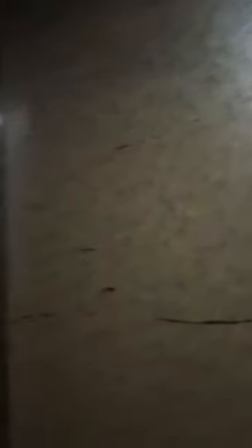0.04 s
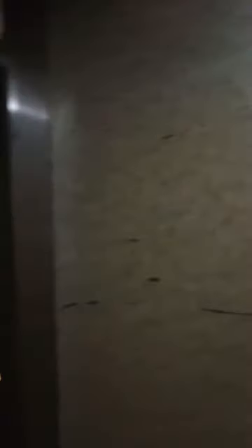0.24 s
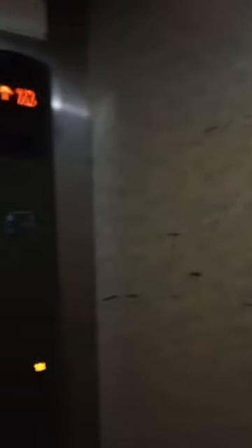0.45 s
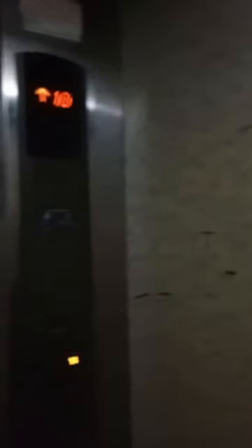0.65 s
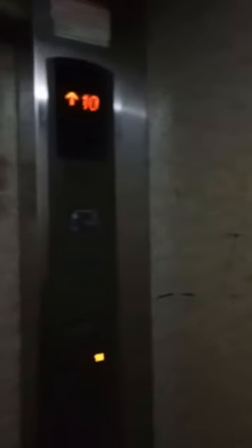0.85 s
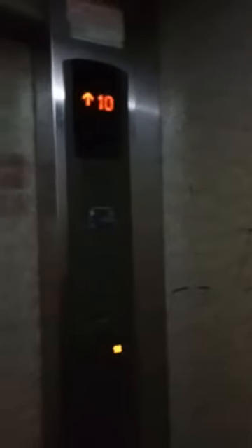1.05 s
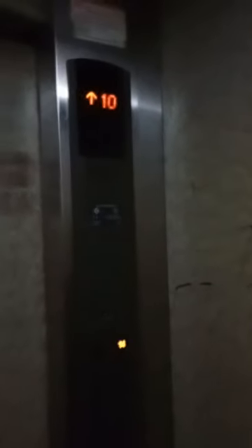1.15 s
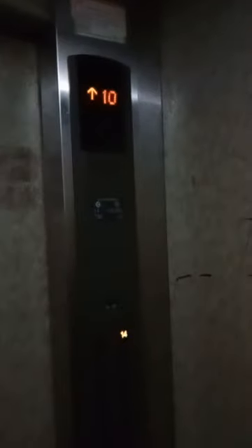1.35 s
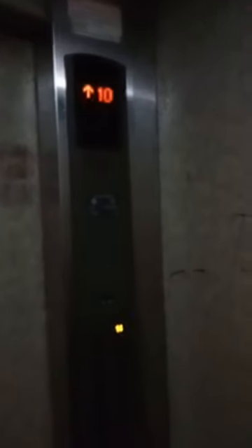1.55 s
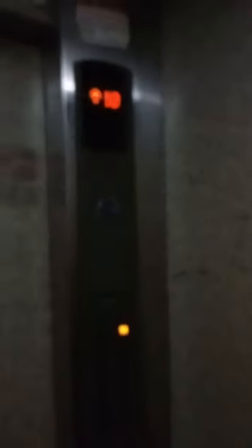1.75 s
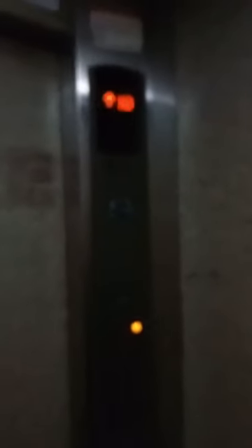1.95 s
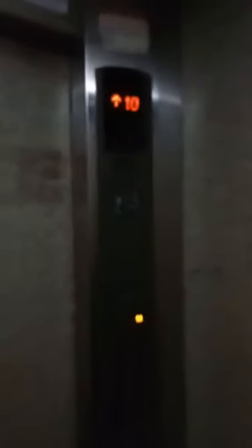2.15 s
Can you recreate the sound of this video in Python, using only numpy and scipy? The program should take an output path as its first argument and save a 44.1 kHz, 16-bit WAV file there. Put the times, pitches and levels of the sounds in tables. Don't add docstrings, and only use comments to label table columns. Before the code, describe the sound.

Gritty metallic scrape and rattle of a loose panel inside a small, low-rumbling elevator cabin

```python
import sys
import numpy as np
from scipy import signal
from scipy.fft import rfft, irfft, next_fast_len
from scipy.io import wavfile
from scipy.ndimage import map_coordinates

SR = 44100
rng = np.random.default_rng(int(sys.argv[2]) if len(sys.argv) > 2 else 0)


def boost(x):
    u = np.asarray(x, float) / 20
    return 10 ** u


def master(y):
    cut = np.clip(np.atleast_2d(y).T, -1, 1)
    pcm = np.round(cut * 32767)
    wavfile.write(sys.argv[1], SR, pcm.astype(np.int16))


N = 97020


def unit(x):
    return x / np.sqrt(np.mean(x ** 2) + 1e-20)


def along(points, hz):
    f, v = np.transpose(points)
    return np.interp(np.log(hz + 1), np.log(f + 1), v)


def wobble(rate, size):
    knots = rng.standard_normal(int(size * rate / SR) + 4)
    return map_coordinates(knots, [np.arange(size) * rate / SR])


def filtered(x, response):
    m = next_fast_len(len(x) + 4096)
    return irfft(rfft(x, m) * response(np.fft.rfftfreq(m, 1 / SR)), m)[:len(x)]


def peak(f, hz, width_hz):
    return 1j * f * width_hz / (hz * hz - f * f + 1j * f * width_hz)


def steadied(x, share):
    envelope = np.abs(signal.hilbert(unit(x)))
    return unit(unit(x) / (envelope + 0.083) ** share)


def add(track, s, sound):
    track[round(s * SR):][:len(sound)] += sound


def swell(t, rise_s, t60):
    fade_bend = 1.2
    fade_db = -60 * (np.clip(t - rise_s, 0, None) / t60) ** fade_bend
    return np.clip(t / rise_s, 0, 1) * boost(fade_db)


def grit(size):
    grains_per_s, spread_db, smooth_share, chatter_db = 9000, 1.5, 0.5, 1.2
    slip, size_draw, smooth = rng.standard_normal((3, size))
    struck = rng.random(size) < grains_per_s / SR
    grains = struck * slip * boost(spread_db * size_draw)
    mixed = (1 - smooth_share) * unit(grains) + smooth_share * smooth
    return mixed * boost(chatter_db * wobble(98.3, size))


def free_swings(blows, rise_s):
    out, t = np.zeros(N + SR), np.arange(SR // 2) / SR
    for s, db, t60, hz in blows:
        add(out, s, boost(db) * swell(t, rise_s, t60) * np.sin(2 * np.pi * hz * t))
    return out[:N]


def drive():
    # (frequency [Hz], density [dB per Hz])
    rumble_spectrum = [(15, -18), (35, -11), (81, 2.5), (277, -9), (476, -12.5), (694, -11), (1110, -20),
                       (2150, -20), (7000, -42), (9100, -40), (15400, -120)]
    # (pitch [Hz], width [Hz], level [dB])
    drones = [(85, 15, -71.5), (202, 93, -76.5), (269.3, 24, -69.5), (347, 39, -79), (623, 280, -78.5)]
    rumble_db, rumble_sway_db, hiss_db = -61.5, 1, -72
    drone_sway_db, drone_steady = 1.5, 0.5
    rumble = unit(filtered(rng.standard_normal(N), lambda f: boost(along(rumble_spectrum, f))))
    out = rumble * boost(rumble_db + rumble_sway_db * wobble(6.62, N))
    for hz, width_hz, db in drones:
        drone = filtered(rng.standard_normal(N), lambda f: peak(f, hz, width_hz) ** 2)
        out += boost(db + drone_sway_db * wobble(10.06, N)) * steadied(drone, drone_steady)
    return out + boost(hiss_db) * filtered(rng.standard_normal(N), lambda f: f > 2500)


def cabin(x):
    # (frequency [Hz], t60 [s])
    decay = [(200, 0.079), (1000, 0.17), (4000, 0.17), (8000, 0.1), (15000, 0.19)]
    turn_s = 0.03
    hz, t, z = signal.stft(rng.standard_normal((6, SR // 3)), SR, nperseg=256)
    tails = signal.istft(z * boost(-60 * t / along(decay, hz)[:, None]), SR, nperseg=256)[1]
    pose = np.arange(N) / SR / turn_s % len(tails)
    distance = [np.abs((pose - k + 3) % 6 - 3) for k in range(6)]
    shares = np.cos(np.pi / 2 * np.clip(distance, 0, 1))
    wet = signal.fftconvolve(x * shares, tails / np.linalg.norm(tails[0]), axes=1)
    return np.pad(wet.sum(0), (90, 0))[:N]


def thumps():
    # (time [s], level [dB], t60 [s], pitch [Hz])
    floor_blows = [(0., -58.5, 0.16, 75.2), (.58, -63, 0.15, 63), (.7, -51, 0.13, 70.6),
                   (.774, -42, 0.12, 77), (1.258, -51, 0.1, 82), (1.281, -48, .15, 65),
                   (1.325, -50, 0.053, 81), (1.466, -46.5, 0.19, 85), (1.499, -43, 0.058, 63.4),
                   (1.534, -51, 0.082, 86.4), (1.953, -47, 0.13, 86), (2.172, -45.5, 0.39, 76),
                   (.31, -60, 0.074, 60), (.52, -55, 0.14, 75.5), (.665, -54, .08, 55),
                   (.8, -56, 0.073, 170), (.94, -52, 0.14, 87), (1.42, -56, .1, 80), (1.915, -50, .08, 71),
                   (.56, -59, .1, 158), (.13, -57, .12, 81), (.245, -57, .1, 80), (.45, -59, 0.11, 60),
                   (.62, -57, .1, 60), (1.86, -59, .1, 80), (1.59, -61, .1, 150), (.24, -56, .15, 230),
                   (.275, -56, .15, 205), (1.63, -62, .12, 265)]
    return free_swings(floor_blows, rise_s=0.01)


def taps():
    # (time [s], level [dB], t60 [s], pitch [Hz])
    small_blows = [(.227, -45.5, 0.13, 874), (.394, -40.5, 0.086, 1071), (.483, -38.5, 0.046, 1060),
                   (.482, -42, 0.04, 6040), (1.405, -50.5, 0.094, 1140), (1.41, -50, 0.14, 859),
                   (1.892, -55, 0.16, 5000), (.422, -48, 0.063, 2460), (.44, -55, 0.13, 4200),
                   (.5, -53, 0.14, 4600), (.325, -47, .08, 1100), (.33, -48, .08, 1720),
                   (.42, -50, .25, 900), (1.28, -58, .08, 1400), (1.315, -60, .2, 800)]
    return free_swings(small_blows, rise_s=0.0023)


def tube():
    # (time [s], level [dB], fade t60 [s], pitch [Hz], overtone slope [dB per step])
    hollow = [
        (.32, -45.5, 0.57, 1117, 0.5),
        (.392, -42.5, 0.35, 1213, -2.1),
        (.481, -46.5, 0.42, 1250, -2.5),
        (1.19, -63, 1, 794, -4.5),
        (1.375, -59, 0.43, 890, -9.5),
        (1.375, -60, 0.67, 1114, -8),
        (1.412, -54, 0.36, 873, -8),
    ]
    rise_s, width_hz = 0.0031, 490
    open_hz = 1480
    sag = 0.08
    out, t = np.zeros(N + SR), np.arange(SR // 2) / SR
    for s, db, t60, hz, step_db in hollow:
        def modes(f):
            total = 0
            for k in range(1, 7):
                mode_hz = (k - sag * (k == 1)) * hz
                total = total + boost(step_db * (k - 1)) * peak(f, mode_hz, width_hz) ** 2
            return total / (1 + (hz > 1000) * (open_hz / (f + 1)) ** 2)
        add(out, s, boost(db) * swell(t, rise_s, t60) * unit(filtered(grit(len(t)), modes)))
    return out[:N]


def rings():
    # (time [s], level [dB], fade t60 [s],
    # pitch [Hz], width [Hz])
    panel_modes = [(.16, -65.5, 0.67, 253, 80), (.235, -54.5, 0.44, 196, 70), (.25, -57.5, 0.28, 270, 61),
                   (0.37, -63, 0.18, 260, 56), (.395, -50, 0.52, 946, 170), (.49, -50, 0.5, 900, 160),
                   (0.489, -59, 0.54, 1120, 110), (.765, -61, 0.19, 7120, 900),
                   (.78, -60.5, 0.28, 600, 270), (1.09, -56, 0.17, 7740, 270), (1.24, -62, 0.85, 251, 100),
                   (1.277, -50, 0.072, 5700, 230), (1.354, -59, .1, 5000, 1200),
                   (1.32, -58, 0.61, 7360, 530), (1.4, -59.5, 0.72, 230, 44), (1.45, -61, 0.49, 423, 75),
                   (1.476, -54, 0.11, 8900, 620), (1.476, -45.5, 0.056, 10400, 680),
                   (1.235, -64, .8, 830, 119), (1.896, -52.5, 0.13, 7440, 300),
                   (1.905, -47.5, 0.11, 10800, 297), (.228, -33, 0.08, 6300, 1900),
                   (1.94, -72, 0.073, 6300, 900), (2.11, -58.5, 0.096, 3300, 400),
                   (0.016, -58.5, 0.13, 10100, 300), (0.028, -60, 0.14, 7250, 300),
                   (0.032, -55, 0.18, 6600, 400), (.02, -59, .1, 3300, 440),
                   (.164, -59.5, 0.17, 10700, 270), (.164, -54.5, .12, 7700, 300),
                   (.172, -58.5, 0.24, 5600, 300), (.165, -57.5, 0.18, 3500, 670),
                   (.393, -50, 0.093, 4750, 260), (0.3, -55, 0.11, 3600, 260), (0.36, -50, .1, 6600, 300),
                   (1.277, -55.5, .2, 3700, 330), (1.362, -54.5, .2, 7000, 600),
                   (1.385, -64, 0.56, 2090, 230), (1.405, -59.5, 0.46, 1390, 150),
                   (.24, -42, 0.23, 7200, 660),
                   (.19, -59.5, 0.25, 200, 70), (.245, -54, 0.28, 663, 160), (.394, -52, 0.44, 1145, 180),
                  (.485, -50, 0.54, 1145, 204), (.226, -43, .15, 2250, 600), (1.41, -56.5, 0.62, 1042, 320),
                  (1.38, -59, 0.81, 858, 143), (1.36, -58, .6, 15000, 1500), (1.45, -56, 0.36, 15000, 1500),
                  (.215, -42, .12, 12000, 2400), (1.354, -47, .04, 6200, 2900), (1.5, -64, .3, 403, 55),
                  (0.76, -64, 0.26, 226, 60), (.6, -70, .9, 14500, 2000)]
    rise_s, steady = 0.0034, 0.63
    out, t = np.zeros(N + SR), np.arange(SR // 2) / SR
    for s, db, t60, hz, width_hz in panel_modes:
        ring = filtered(grit(len(t)), lambda f: peak(f, hz, width_hz) ** 2)
        add(out, s, boost(db) * swell(t, rise_s, t60) * steadied(ring, steady))
    return out[:N]


def scrapes():
    # (time [s], rise [s], level [dB], fade t60 [s], brightness [dB per octave])
    strokes = [(.012, 0.023, -45, 0.18, 4.5), (0.163, 0.0036, -50, 0.43, -0.5),
               (0.21, 0.0046, -31.5, 0.14, 3), (.223, 0.0061, -26.5, 0.24, 0), (.262, .015, -40, 0.22, -2),
               (.316, 0.0041, -32.5, 0.34, -1.5), (0.391, 0.0028, -39, 0.12, 6),
               (0.48, 0.003, -45, 0.28, -4.5), (.752, .026, -55.5, 0.12, 5.5),
               (0.804, 0.026, -60, 0.33, -3), (.845, 0.0043, -60.5, 0.89, -1),
               (0.988, 0.0066, -58.5, 0.3, 3.5), (1.087, 0.004, -51.5, 0.23, 2),
               (1.167, 0.002, -59.5, 0.31, -4), (1.228, 0.0064, -57.5, 0.92, -2),
               (1.274, 0.0035, -46.5, 0.25, 0.5), (1.314, 0.0026, -49, 0.15, 1),
               (1.352, 0.0024, -43.5, 0.59, 4), (1.473, 0.004, -41.5, 0.31, 7),
               (1.895, 0.015, -43, 0.28, 3.5), (1.912, 0.018, -44.5, 0.48, 0.5),
               (2.031, 0.019, -50, 0.92, 2.5), (2.094, 0.006, -44, 0.36, 3.5),
               (2.15, 0.029, -48.5, 0.46, 8), (0., 0.0082, -58.5, 0.23, -0.5),
               (.125, 0.035, -60.5, .4, -0.5), (.32, .003, -33, .06, 0.5), (1.378, .004, -59, 0.65, -7),
               (.56, .02, -64, .5, 6), (1.94, .004, -50, .08, -2), (1.408, 0.0036, -56, 0.23, 2)]
    # (frequency [Hz], level [dB])
    grit_spectrum = [(300, -67), (600, -18.5), (900, -10), (2000, -5), (4000, -1), (6000, 2), (9000, -0.5),
                     (16000, -3)]
    dull_hz, dull_db_per_s = 7260, 71
    out, t = np.zeros(N + SR), np.arange(SR // 2) / SR
    for s, rise_s, db, t60, tilt_db in strokes:
        def colour(f):
            octaves = np.log2(np.clip(f, 500, 12000) / 6000)
            return boost(along(grit_spectrum, f) + tilt_db * octaves)
        rub = unit(filtered(grit(len(t)), colour))
        treble = filtered(rub, lambda f: 1 / (1 + (dull_hz / (f + 1)) ** 4))
        dulled = rub - treble * (1 - boost(-dull_db_per_s * t))
        add(out, s, boost(db) * swell(t, rise_s, t60) * dulled)
    return out[:N]


def scene():
    # (time [s], t60 [s], free again [s])
    settles = [
        (.54, .3, .745),
        (1.545, .35, 1.88),
    ]
    cabin_db = -7.5
    duck_from_s, duck_to_s, duck_db, duck_ease_s = 0.2, 0.56, -3, 0.04
    t = np.arange(N) / SR
    damping_db = np.zeros(N)
    for s, t60, free_s in settles:
        damping_db += -60 * np.clip(t - s, 0, None) / t60 * (t < free_s)
    near = boost(damping_db) * (taps() + tube() + rings() + scrapes())
    inside_s = np.minimum(t - duck_from_s, duck_to_s - t)
    duck = boost(duck_db * np.clip(inside_s / duck_ease_s, 0, 1))
    return (duck * drive() + thumps() + near + boost(cabin_db) * cabin(near))[None]


def roll_off(x):
    return signal.sosfilt(signal.butter(12, 17040, fs=SR, output="sos"), x)


def record(dry):
    # (frequency [Hz], gain [dB])
    microphone = [(6000, 1), (7400, 4.5), (8100, -5), (9200, -10.5), (10500, -0.5), (11900, -12.5),
                  (13500, -20.5), (15100, -5.5)]
    preamp_db, top_hz, above_top_db = -89, 15830, -70
    heard = filtered(dry[0], lambda f: boost(along(microphone, f)))
    heard = heard + boost(preamp_db) * rng.standard_normal(N)
    mix = filtered(heard, lambda f: boost(above_top_db * (f > top_hz)))[None]
    return roll_off(mix)


dry = scene()
out = record(dry)
master(out)
```